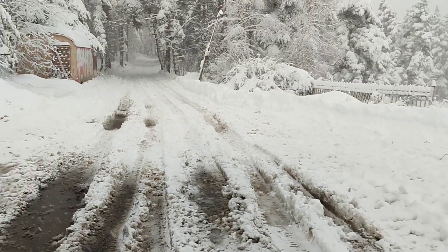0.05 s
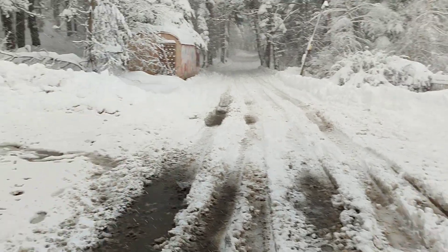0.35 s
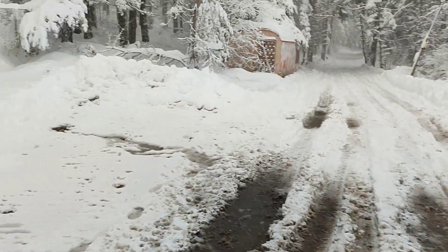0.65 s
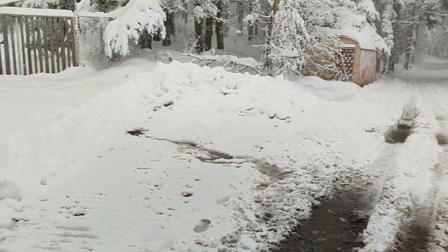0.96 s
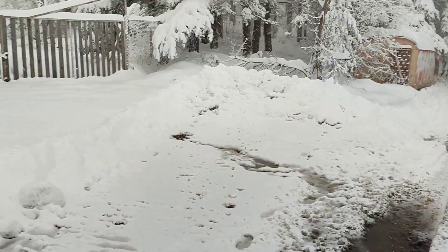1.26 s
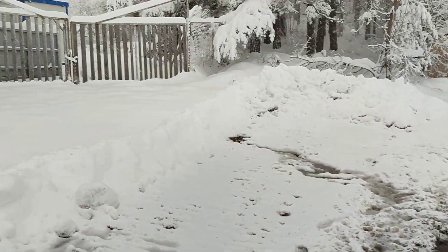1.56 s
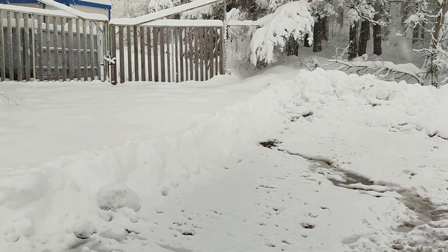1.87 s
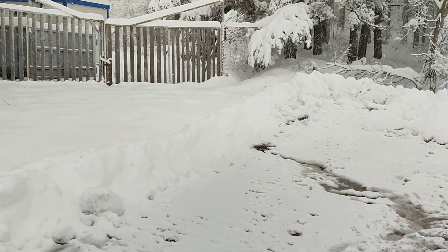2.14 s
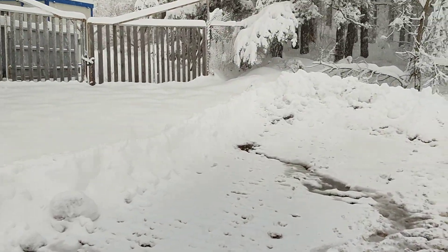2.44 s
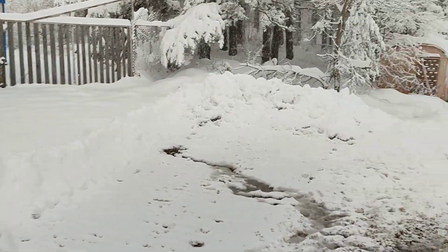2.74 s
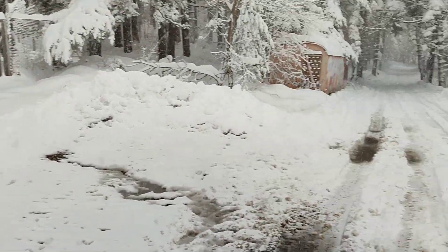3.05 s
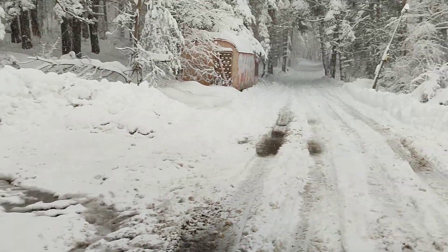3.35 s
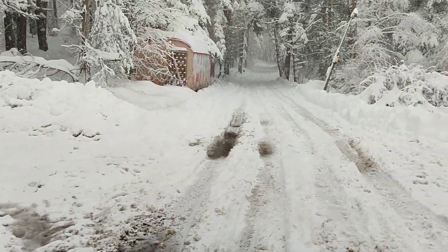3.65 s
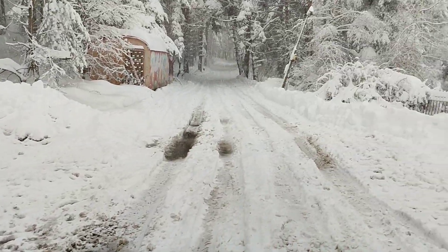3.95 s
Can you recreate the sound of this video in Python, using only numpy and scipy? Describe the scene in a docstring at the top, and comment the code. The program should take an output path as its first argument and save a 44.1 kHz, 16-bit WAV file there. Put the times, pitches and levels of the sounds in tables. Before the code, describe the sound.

Soft, irregular crunches and scuffs come from boots turning in snow on a quiet forest road. Jacket cloth rustles, mostly at the start, and low puffs knock the close microphone over faint sleet, scattered drips and steady hiss.

```python
"""Standing in wet snow

Someone turns to look around on a quiet forest road. Snow slips and packs under the boots in short
crunches and slow scuffs, and a jacket swishes as its weave catches. Sleet and meltwater patter all
round over the hiss of the forest. Light air rumbles on the microphone, and now and then a puff,
a soft knock or a landing flake hits its left port."""
import sys
import numpy as np
from scipy import signal
from scipy.fft import rfft, irfft
from scipy.io import wavfile

SR = 44100
rng = np.random.default_rng(int(sys.argv[2]) if len(sys.argv) > 2 else 0)


def transcribe(u):
    """Save the signal u as a 16-bit wav file named by the first command-line argument.

    u: samples, shape (n,) or (channels, n), limited to [-1, 1]; the rate is SR.
    q: integer samples, one column per channel.
    """
    v = np.clip(np.atleast_2d(u).T, -1, 1)
    q = np.round(v * 32767).astype(np.int16)
    wavfile.write(sys.argv[1], SR, q)


N = 176400
TIME = np.arange(N) / SR
SHORT = 4096   # samples in a one-shot

# Tone of the forest hiss: (frequency [Hz], level [dB])
AIR_SPECTRUM = [(30, 16.5), (100, 2), (250, 1.5), (600, -4), (1200, -7.5), (2200, -9), (4000, -13.5),
                (8000, -17), (15000, -16)]

# Rise and fall of the wind on the ports: (time [s], level [dB])
WIND_LEVELS = [(0, -51.5), (.3, -38.5), (.6, -40.5), (.7, -46), (1.45, -41.5), (1.7, -51), (1.95, -56),
               (2.3, -51), (2.9, -57.5), (3.08, -46), (3.6, -56), (3.88, -46), (4, -50)]
# Tone of its rumble: (frequency [Hz], level [dB])
WIND_SPECTRUM = [(12, -1.5), (25, 3.5), (55, -4), (90, -12), (150, -24), (300, -38.5), (800, -61)]

# EQ on the sleet: (frequency [Hz], gain [dB])
SLEET_EQ = [(500, -15), (1500, 0), (2800, 0), (6000, -4), (10000, -1), (15000, -3)]
SLEET_PER_S, SLEET_DECAY_S, SLEET_DB = 200, 0.0024, -62

# A sole twists and packs the snow: (peak time [s], rise [s], fall [s], level [dB], pitch [Hz])
SOLE_SCUFFS = [(.01, 0.016, 0.025, -59.5, 980), (.402, 0.02, 0.037, -52, 1160),
               (.945, 0.095, 0.091, -65.5, 590), (1.09, 0.047, 0.071, -61.5, 900),
               (1.58, 0.0079, 0.016, -57.5, 2320), (1.68, 0.047, 0.028, -60.5, 730),
               (1.79, 0.02, 0.05, -63.5, 1200), (2.62, 0.044, 0.19, -63, 900),
               (3.29, 0.038, 0.12, -59, 860), (3.46, 0.022, 0.035, -57, 940)]
# Snow gives way under a boot: (time [s], length [s], level [dB], pitch [Hz], relative grit [dB])
SNOW_CRUNCHES = [(0.051, 0.01, -44.5, 750, -7.5), (0.057, 0.0076, -41, 1510, -2.5),
                 (0.2214, 0.01, -47.5, 950, -21), (0.349, 0.0069, -49.5, 610, 1.5),
                 (0.548, 0.0072, -48, 1580, -6), (1.2127, 0.0039, -38, 800, -30),
                 (1.2192, 0.0047, -48.5, 1160, -15), (1.4173, 0.005, -46, 1150, -25),
                 (1.4215, 0.0017, -36.5, 870, -28), (1.777, 0.023, -51, 1110, -14),
                 (2.274, 0.0039, -55.5, 990, -6), (2.692, 0.0033, -39.5, 626, -12.5),
                 (2.7178, 0.0029, -41, 375, -12), (3.415, 0.0066, -52.5, 1050, -12),
                 (3.474, 0.0051, -47, 590, -12), (3.529, 0.007, -53.5, 1020, -9),
                 (3.653, 0.0023, -34.5, 1200, -13), (3.6555, 0.0051, -39, 453, -10),
                 (3.66, 0.003, -44, 1410, -14), (3.748, 0.0038, -50.5, 574, -11)]
SNOW_LOW_HZ, SNOW_TOP_HZ = 165, 2300
MAIN_SLIP_S = 0.0037   # in a crunch shorter than this, one slip outweighs all the others
HEEL_HZ, HEEL_DB = 303, -6.5   # dull push of the boot's weight under a crunch pitched at 1 kHz
FINE_GRAINS_PER_S = 18000   # snow grit and jacket weave

# Jacket cloth slides: (peak time [s], rise [s], fall [s], level [dB], tilt [dB/octave])
JACKET_SWISHES = [(0.224, 0.0017, 0.021, -45, 0.5), (0.285, 0.0029, 0.054, -53, -6.5),
                  (0.357, 0.059, 0.099, -51, -3), (0.959, 0.042, 0.038, -54, -5.5),
                  (1.09, 0.057, 0.057, -61, -0.5), (1.521, 0.0031, 0.0055, -49, -3.5),
                  (1.577, 0.013, 0.03, -52, -4.5), (1.79, 0.025, 0.029, -58, 2),
                  (2.69, 0.011, 0.066, -63, 4), (2.82, 0.088, 0.089, -62.5, -5.5),
                  (3.3, 0.032, 0.12, -62, -2)]
# Tone of the weave: (frequency [Hz], level [dB])
CLOTH_SPECTRUM = [(300, -38), (1000, -10.5), (2000, -4), (3800, -6), (5300, -7), (8000, -5), (15000, -6)]
# Ribbed cloth sings faintly: (peak time [s], rise [s], fall [s], level [dB], pitch [Hz])
RIB_SQUEAKS = [(.263, 0.0062, 0.0056, -56, 5150), (.284, 0.002, 0.019, -51.5, 5510),
               (.35, 0.0062, 0.012, -47.5, 5340), (0.432, 0.0034, 0.012, -50.5, 1044),
               (2.475, 0.015, 0.025, -62, 1785), (3.03, 0.14, 0.034, -66, 2000),
               (3.295, 0.027, 0.022, -63, 2300), (3.431, 0.015, 0.019, -56, 1100)]
RIB_SAG_OCTAVES_PER_S = 2

# Puffs of air and soft knocks on the left port: (time [s], peak level [dB], pitch [Hz])
PORT_THUMPS = [(0.394, -22, 40.8), (0.802, -27.5, 61), (0.927, -28, 134), (1.054, -33, 114),
               (1.067, -28, 55.3), (1.409, -30, 49), (2.3191, -33.5, 204), (3.216, -33.5, 44.4),
               (3.78, -24, 111), (3.8191, -32.5, 122)]

# Near drops hit snow and jacket: (time [s], level [dB], pitch [Hz], left minus right [dB])
NEAR_DROPS = [(0.482, -40.5, 1570, -6), (0.513, -46.5, 1830, 0), (0.512, -56, 12300, -13.5),
              (0.876, -42.5, 1780, -6), (1.550, -49, 1870, 5), (1.751, -48, 1340, -8),
              (1.978, -48, 2740, 0), (2.585, -43.5, 8200, -1), (2.687, -42.5, 9200, -8),
              (2.738, -45.5, 6350, -12), (3.13, -55.5, 3700, -5), (3.148, -49.5, 2840, 9),
              (3.226, -47.5, 1270, -3), (3.613, -45.5, 1900, 1), (3.672, -48, 7500, 9),
              (3.893, -47, 3300, -4)]
DROP_DECAY_S, DROP_CLICK_DB = 0.00055, -9.5

# Envelope of the one fluttering gust: (peak time [s], rise [s], fall [s])
GUST_SWELL = (.725, .04, .05)
GUST_DB, GUST_HZ = -50, 138

# Flakes land on the left port: (time [s], crackle level [dB], push level [dB])
PORT_FLAKES = [(0.924, -22, -26), (2.3118, -21.5, -48), (2.3153, -30.5, -63)]
FLAKE_DECAY_S, FLAKE_CONTACT_S = 0.000077, 0.0008


def from_db(db):
    """Decibels to gain."""
    return 10 ** (np.asarray(db) / 20)


def rms_one(x):
    """Scale each channel to unit rms."""
    return x / np.sqrt(np.mean(x ** 2, axis=-1, keepdims=True) + 1e-20)


def pan(db):
    """Stereo gains of unit mean power; positive dB is to the left."""
    return rms_one(from_db([db / 2, -db / 2]))[:, None]


def colour(x, points, tilt_db=0):
    """EQ a steady sound along a curve, tilted per octave; unit rms."""
    hz, db = np.transpose(points)
    octave = np.log2(np.maximum(np.fft.rfftfreq(N, 1 / SR), 1))
    gain = from_db(np.interp(octave, np.log2(hz), db) + tilt_db * octave)
    return rms_one(irfft(rfft(x) * gain, N))


def cut(x, hz, kind):
    """Second-order low- or high-pass."""
    return signal.sosfilt(signal.butter(2, hz, kind, fs=SR, output="sos"), x)


def resonate(x, hz, width):
    """A broad resonance; its width is a share of its pitch."""
    r = np.exp(-np.pi * width * hz / SR)
    return signal.lfilter([1, 0, -1], [1, -2 * r * np.cos(2 * np.pi * hz / SR), r * r], x + 1e-18)


def bell_eq(x, hz, width_hz, db):
    """Boost or dip one band."""
    band = signal.lfilter(*signal.iirpeak(hz, hz / width_hz, fs=SR), x)
    return x + (from_db(db) - 1) * band


def grains(per_s, shape, spread_db=5.0):
    """Random clicks of either sign, their sizes scattered by spread_db."""
    hits = rng.random(shape) < per_s / SR
    size = from_db(spread_db * np.minimum(rng.exponential(1, shape), 4))
    return hits * size * rng.choice([-1, 1], shape)


def catching(depth_db):
    """A jittering gain: friction grips and lets go some tens of times a second."""
    return from_db(depth_db * rms_one(cut(rng.standard_normal(N), 40, "low")))


def widen(pair, spread):
    """Two unrelated signals as mid and side."""
    return rms_one(pair[0] + spread * pair[1] * np.array([[1], [-1]]))


def lean_right(x, db):
    """Shift the upper mids towards the right port."""
    return bell_eq(x, hz=1880, width_hz=1600, db=[[-db], [db]])


def swell(s, rise, fall):
    """A bell-shaped envelope peaking at time s, with its own rise and fall."""
    flank = np.where(TIME < s, rise, fall)
    return np.exp(-.5 * np.minimum(((TIME - s) / flank) ** 2, 100))


def add(out, s, sound):
    """Mix a one-shot in at time s."""
    start = int(s * SR)
    a, b = max(start, 0), min(start + sound.shape[-1], N)
    out[:, a:b] += sound[..., a - start:b - start]


def forest_air(level_db=-59):
    """The even hiss of the thawing forest."""
    return from_db(level_db) * colour(widen(rng.standard_normal((2, N)), spread=0.65), AIR_SPECTRUM)


def wind(lumps_db=2.44):
    """Light air makes a lumpy rumble, unrelated in the two ports."""
    lumps = colour(rng.standard_normal((2, N)), [(8, 0), (40, -40), (400, -120)])
    level_db = np.interp(TIME, *np.transpose(WIND_LEVELS)) + lumps_db * lumps
    return from_db(level_db) * pan(db=2.5) * colour(rng.standard_normal((2, N)), WIND_SPECTRUM)


def sleet(low_hz=1520, high_hz=13100, bands=8, spread_db=2.5, scatter_db=3, click_db=1):
    """Sleet ticks at random all round, each tick with its own size, side and pitch band."""
    out = 0
    for hz in np.geomspace(low_hz, high_hz, bands):
        hits = rng.random(N) < SLEET_PER_S / bands / SR
        size = hits * from_db(spread_db * np.minimum(rng.exponential(1, N), 2.5))
        side = from_db(scatter_db * rng.standard_normal(N))
        energy = size ** 2 * np.array([side, 1 / side]) / (side + 1 / side)
        tails = signal.lfilter([1], [1, -np.exp(-2 / (SLEET_DECAY_S * SR))], energy + 1e-18)
        splash = np.sqrt(tails) * rng.standard_normal((2, N))
        out = out + rms_one(resonate(splash, hz, width=0.54)) + from_db(click_db) * rms_one(splash)
    return from_db(SLEET_DB) * pan(db=-1) * colour(out, SLEET_EQ)


def scuffs(grains_per_s=3500, top_hz=2460):
    """Dense, dull grains as a sole twists in the snow."""
    bed = cut(cut(grains(grains_per_s, (2, N)), top_hz, "low"), SNOW_LOW_HZ, "high")
    bed = widen(bed, spread=0.29) * catching(depth_db=2.0)
    return sum(from_db(db) * swell(s, rise, fall) * rms_one(resonate(bed, hz, width=0.61))
               for s, rise, fall, db, hz in SOLE_SCUFFS)


def crunches(slips_per_s=2500):
    """Packed snow gives in a quick run of slips round one main slip, a dull push below, grit on top."""
    out = np.zeros((2, N))
    t = (np.arange(SHORT) - SHORT / 2) / SR
    steepness = np.where(t < 0, 3.1, 1.43)   # fast attack, slower release
    for s, length, db, hz, grit_db in SNOW_CRUNCHES:
        load = 1 / np.cosh(np.clip(steepness * t / length, -20, 20))
        slips = grains(slips_per_s, (2, SHORT), spread_db=0) * load
        slips[0, SHORT // 2] += np.linalg.norm(slips[0]) * MAIN_SLIP_S / length
        body = resonate(slips, hz, width=0.45)
        body = cut(cut(body, SNOW_TOP_HZ, "low"), SNOW_TOP_HZ, "low")
        body = rms_one(cut(body, SNOW_LOW_HZ, "high"))
        heel_hz = HEEL_HZ * np.sqrt(hz / 1000)
        heel = rms_one(cut(resonate(slips[0], heel_hz, width=0.78), 2 * heel_hz, "low"))
        grit = grains(FINE_GRAINS_PER_S, (2, SHORT)) * load
        grit = rms_one(cut(grit + 1.44 * cut(grit, 6200, "low"), 1200, "high"))
        snow = rms_one(widen(body, spread=0.29) - from_db(HEEL_DB) * heel)
        gain = from_db(db) * np.sqrt(length * SR / SHORT)
        add(out, s + t[0], gain * (snow + from_db(grit_db) * grit))
    return out


def jacket():
    """The weave catches in tiny grains, each swish with its own brightness; ribs add a faint pitch."""
    weave = widen(grains(FINE_GRAINS_PER_S, (2, N)), spread=0.7)
    swishes = sum(from_db(db) * swell(s, rise, fall) * colour(weave, CLOTH_SPECTRUM, tilt_db)
                  for s, rise, fall, db, tilt_db in JACKET_SWISHES)
    squeaks = sum(from_db(db) * swell(s, rise, fall) * rib_tone(s, hz)
                  for s, rise, fall, db, hz in RIB_SQUEAKS)
    return pan(db=-3.5) * (swishes + squeaks) * catching(depth_db=1.65)


def rib_tone(s, hz, width=0.2):
    """Sliding ribs sing a rough, narrow tone that sinks as the stroke slows, passing hz at time s."""
    pitch = hz * 2 ** (-RIB_SAG_OCTAVES_PER_S * np.clip(TIME - s, -.5, .5))
    wobble = cut(rng.standard_normal((2, N)), width * hz / 2, "low")
    tone = (wobble[0] + 1j * wobble[1]) * np.exp(2j * np.pi * np.cumsum(pitch) / SR)
    return rms_one(np.array([tone.real, tone.imag]))


def thumps():
    """Each puff or soft knock sends one smooth pressure swing into the left port."""
    out = np.zeros((2, N))
    for s, db, hz in PORT_THUMPS:
        phase_squared = np.minimum((np.pi * hz * (TIME - s)) ** 2, 100)
        out[0] += from_db(db) * (1 - 2 * phase_squared) * np.exp(-phase_squared)
    return out


def drops():
    """Each near drop is a tiny splash that clicks and rings briefly."""
    out = np.zeros((2, N))
    fade = np.exp(-np.arange(SHORT) / SR / DROP_DECAY_S)
    for s, db, hz, pan_db in NEAR_DROPS:
        splash = rng.standard_normal((2, SHORT)) * fade
        ring = rms_one(resonate(splash, hz, width=0.45))
        click = from_db(DROP_CLICK_DB) * rms_one(cut(splash, hz, "high"))
        gain = from_db(db) * np.sqrt(2 * DROP_DECAY_S * SR / SHORT)
        add(out, s, gain * pan(pan_db) * widen(ring + click, spread=0.82))
    return out


def gust():
    """One gust flutters on the ports, pitched above the rumble."""
    flutter = resonate(rng.standard_normal((2, N)), GUST_HZ, width=0.2)
    return from_db(GUST_DB) * swell(*GUST_SWELL) * rms_one(cut(flutter, 2 * GUST_HZ, "low"))


def flakes():
    """Flakes land on the left port with a low push and a tiny bright crackle."""
    out = np.zeros((2, N))
    t = np.arange(SHORT) / SR
    for s, crackle_db, push_db in PORT_FLAKES:
        burst = rng.standard_normal(SHORT) * np.exp(-t / FLAKE_DECAY_S)
        crackle = rms_one(cut(burst, 2200, "high")) * np.sqrt(FLAKE_DECAY_S * SR / SHORT / 2)
        push = cut(np.exp(-t / FLAKE_CONTACT_S), 49, "high")
        add(out[:1], s, from_db(crackle_db) * crackle + from_db(push_db) * push)
    return out


def scene():
    """A dry, open-air mix. The upper mids lean right, most of all those from the ground."""
    boots = lean_right(crunches() + scuffs(), db=2)
    mix = boots + jacket() + drops() + sleet() + flakes() + thumps() + wind() + gust() + forest_air()
    return lean_right(mix, db=1.5)


def record(dry, cutoff_hz=16000):
    """The microphone scoops the treble; the very top is cut steeply."""
    scooped = bell_eq(dry, hz=9160, width_hz=3700, db=-8)
    return signal.sosfilt(signal.ellip(10, .1, 70, cutoff_hz, fs=SR, output="sos"), scooped)


dry = scene()
out = record(dry)
transcribe(out)
```